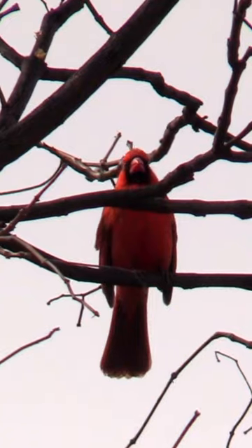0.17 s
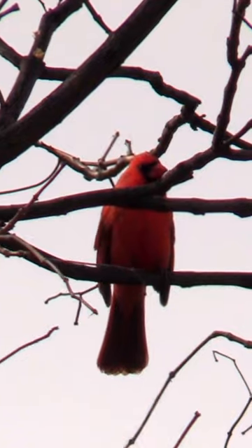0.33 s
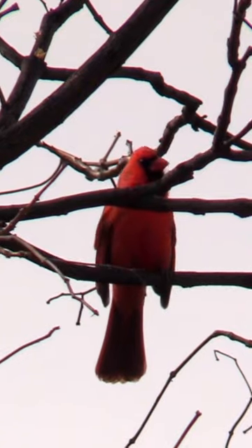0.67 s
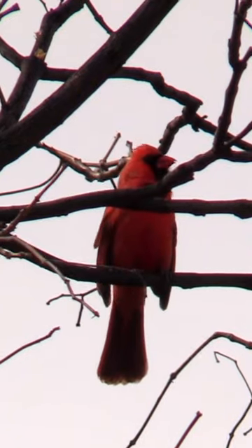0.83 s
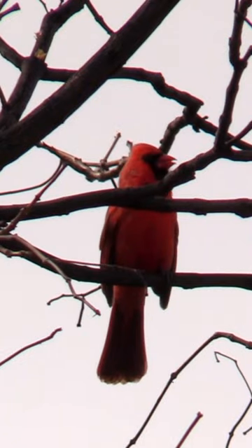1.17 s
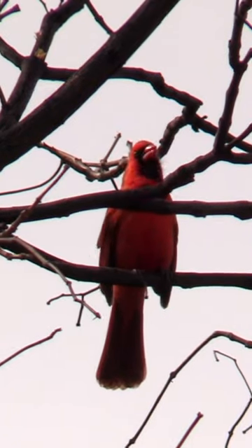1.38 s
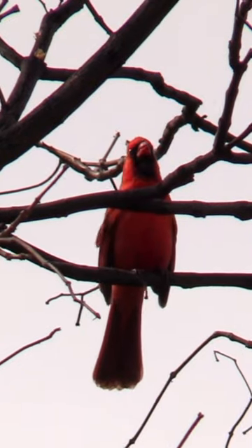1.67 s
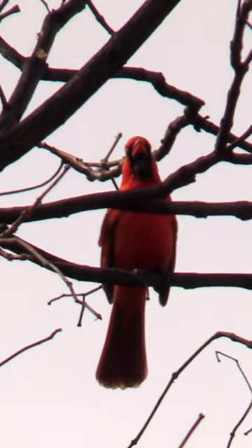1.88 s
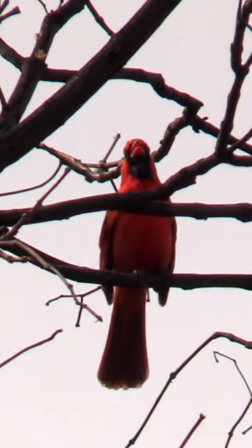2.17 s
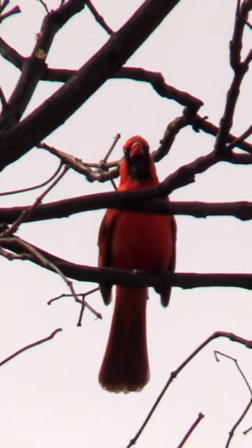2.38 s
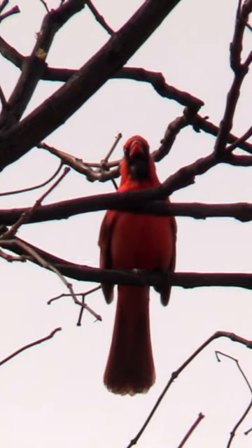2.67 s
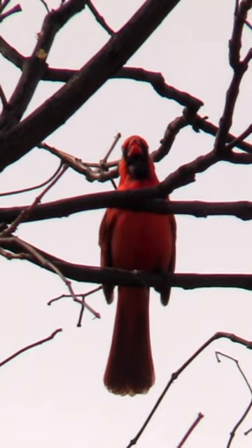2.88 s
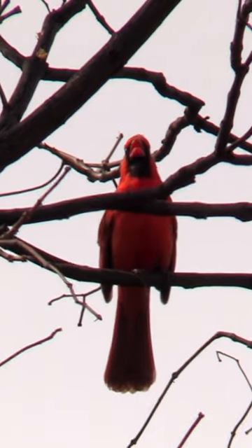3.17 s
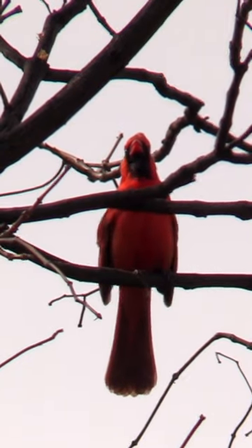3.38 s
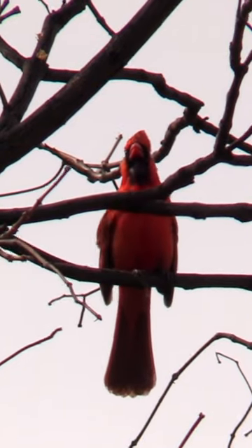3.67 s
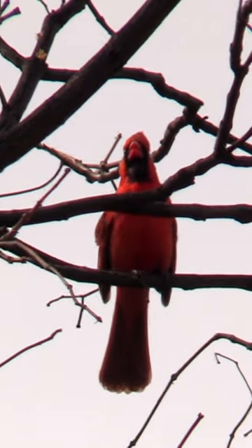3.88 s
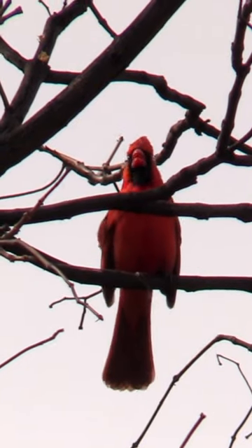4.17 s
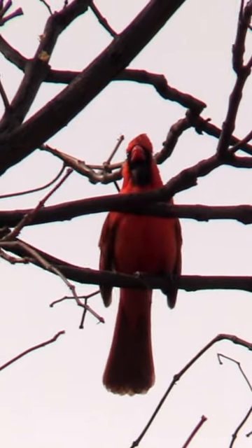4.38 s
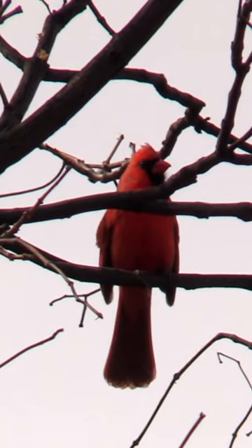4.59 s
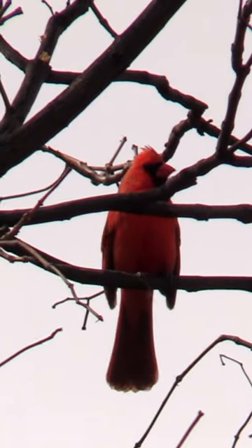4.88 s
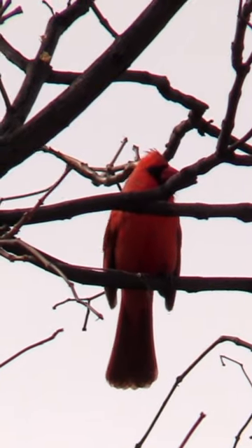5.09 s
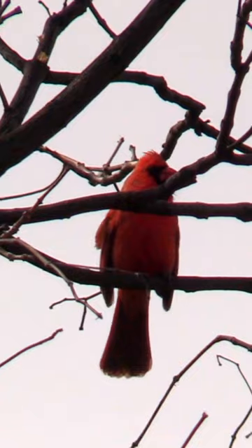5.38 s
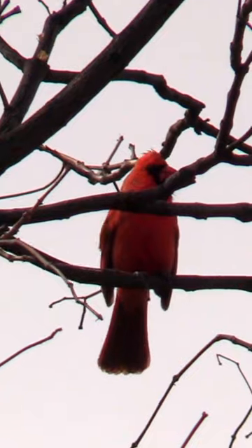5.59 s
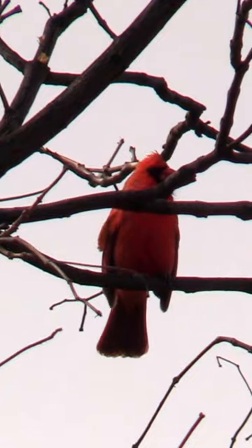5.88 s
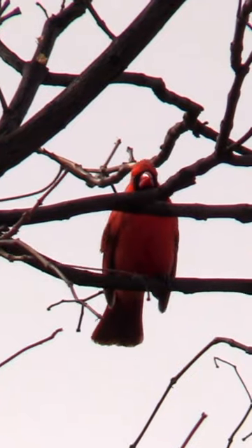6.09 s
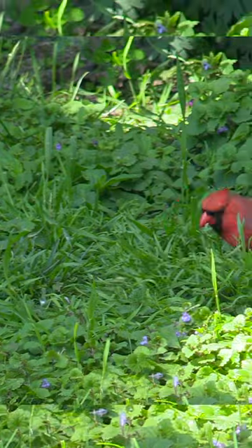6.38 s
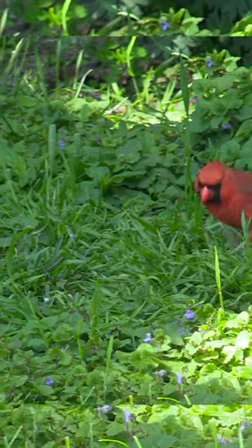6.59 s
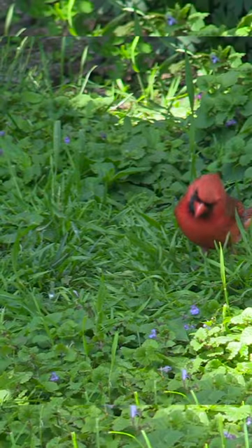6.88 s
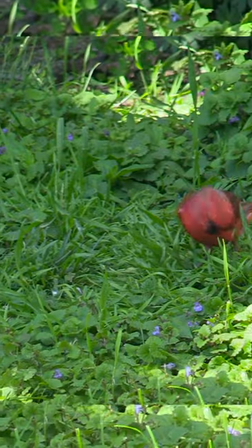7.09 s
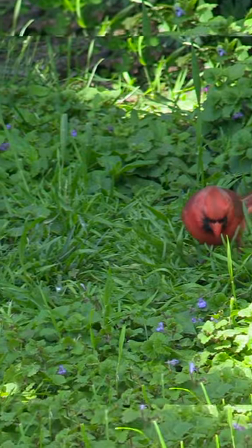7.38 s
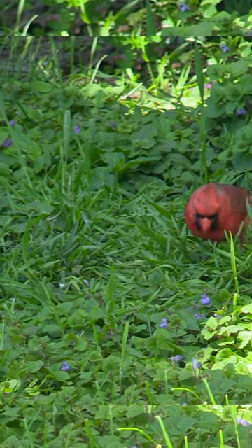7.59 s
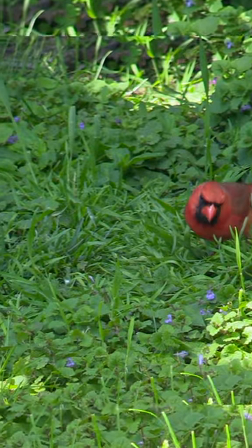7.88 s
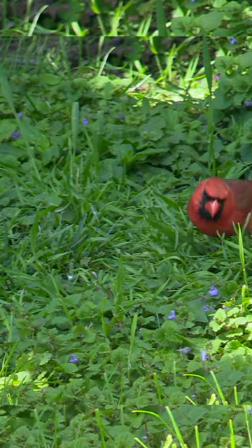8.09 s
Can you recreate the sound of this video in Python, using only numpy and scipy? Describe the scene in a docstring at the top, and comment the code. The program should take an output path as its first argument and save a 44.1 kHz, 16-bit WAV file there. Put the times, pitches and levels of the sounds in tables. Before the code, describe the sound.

Clear down-slurred songbird whistles ring among trees, followed by distant dove coos and softer whistles, over a steady far traffic hum.

```python
"""Songbirds over distant traffic.

A songbird on a branch whistles hooks, rises and down-slurs; trees return a short wash of echoes.
A neighbour answers with raspy arches and a dove coos. The scene then changes to a garden: flatter
slurs and a plunging whistle over a fuller hum. Each whistle is a gliding syrinx tone whose
overtones are shaped by windpipe and beak."""
import sys
import numpy as np
from scipy import signal
from scipy.fft import rfft, irfft
from scipy.io import wavfile
from scipy.ndimage import uniform_filter1d

SR = 44100
rng = np.random.default_rng(int(sys.argv[2]) if len(sys.argv) > 2 else 0)


def generate_wav(signal):
    """Clip the signal to [-1, 1] and save it as 16-bit WAV at the path in sys.argv[1]."""
    frames = np.transpose(np.atleast_2d(signal))
    scaled = np.clip(frames, -1, 1) * 32767
    pcm = np.round(scaled).astype(np.int16)
    wavfile.write(sys.argv[1], SR, pcm)


N = 363384
GARDEN_START_S = 6.42

# Far traffic and air at each place. Each row: frequency in Hz, relative density in dB.
BRANCH_HUM = [(15, -70), (25, -25.5), (45, -22.5), (135, -6.5), (240, -2), (410, -4.5), (545, -4.5),
              (625, -1.5), (690, -4.5), (780, -11.5), (1200, -8.5), (1330, -16), (1630, -17.5),
              (2600, -21.5), (6000, -30), (15600, -43)]
GARDEN_HUM = [(15, -45), (25, -28), (70, -17.5), (152, -2), (511, -5), (651, -8), (744, -7.5),
              (2070, -20.5), (4910, -27), (15600, -42.5)]
# Echoes off trunks and walls, near and far paths. Each row: delay in seconds, energy per ms in dB.
NEAR_ECHOES = [(.003, -33), (.009, -15), (.012, -24.5), (.021, -18), (.027, -24), (.05, -31.5), (.1, -37),
               (0.129, -39.5), (.2, -50.5), (.3, -58), (.6, -61)]
FAR_ECHOES = [(.003, -11), (.01, -19), (.022, -24), (.04, -28), (0.082, -28), (.12, -36.5), (.14, -35.5),
              (.2, -45), (.3, -53), (.6, -71)]

# Windpipe and beak response. Each row: frequency in Hz, gain in dB.
SINGER_THROAT = [(1400, -15), (1800, -11), (2200, -4), (3000, 6), (4000, -16), (6000, -9), (6900, -8),
                 (7500, 9), (8200, 4), (9000, 2), (10500, -5), (11400, 4.5), (12500, -2.5), (15500, -30)]
NEIGHBOUR_THROAT = [(2300, -21.5), (3000, -13), (4000, -4.5), (4700, 1.5), (5700, 2), (7600, -12.5),
                    (9200, -6.5), (11500, -4), (15500, -36)]
GARDEN_THROAT = [(1400, -12), (1800, -8), (2200, -0.5), (3000, 19), (3700, 1), (4200, -10.5), (6000, -8),
                 (7000, -9), (8000, -1.5), (9500, -6), (10800, -5), (12000, 10.5), (13000, -7),
                 (15500, -20)]
# Handover from the low to the high side of the syrinx: start and end pitch in Hz.
HANDOVER_HZ = [2150, 2860]
# Overtones 2, 3, .. re the fundamental, before brightness and throat.
# Each row: low side in dB, high side in dB.
OPENING_OVERTONES_DB = [(-39, -28), (-67.5, -41), (-38.5, -39), (-43, -37), (-39.5, -51), (-48, -52)]
SLUR_OVERTONES_DB = [(-31, -26.5), (-45, -41), (-32.5, -38.5), (-49, -26), (-48, -53), (-50.5, -57),
                     (-56, -66)]
NEIGHBOUR_OVERTONES_DB = [(-20.5, -15), (-30, -30), (-28, -35)]
GARDEN_OVERTONES_DB = [(-34, -47), (-49, -50), (-33.5, -50), (-39, -42), (-41.5, -50), (-58, -50)]
PLUNGE_OVERTONES_DB = [(-24, -27.5), (-45, -41.5)]

# Dove, one list per coo. Each row: time in seconds, pitch in Hz, level in dB.
COOS = [
    [(3.975, 474, -42), (4.067, 490, -40), (4.28, 457, -43.5), (4.59, 466, -38.5), (4.75, 452, -43.5)],
    [(4.75, 497, -54), (4.77, 494, -33.5), (4.792, 527, -24), (4.804, 656, -32.5), (4.822, 675, -32),
     (5.02, 664, -33.5), (5.182, 628, -31.5), (5.3, 610, -37.5), (5.42, 613, -52)],
    [(5.64, 494, -40), (5.664, 495, -33), (5.732, 502, -26), (5.954, 499, -32), (6.15, 484, -35.5),
     (6.32, 476, -37), (6.41, 452, -52)],
]
# Brief dips in the coos. Each row: time in seconds, depth in dB.
COO_DIPS = [(4.297, 9), (4.645, 6), (5.086, 14), (6.088, 13), (6.174, 14)]

# Single notes. Each row: time in seconds, pitch in Hz, level in dB, brightness in dB, optional rasp 0-1.
DROP = [(1.648, 1330, -45, -2), (1.654, 1890, -39, -2), (1.662, 2004, -27, -13), (1.72, 1662, -25.5, -6),
        (1.748, 1470, -39, -9)]
CHIP = [(1.648, 2730, -29.5, -20), (1.654, 3780, -29, -20), (1.662, 4090, -45, -22), (1.7, 3670, -57, -17)]   # an octave above the drop's start
POINTED_NOTE = [(4.53, 3000, -63, -10, .2), (4.57, 3830, -52, -10, .2), (4.595, 4920, -58, -8, .2),
                (4.62, 3970, -50, -8, .2), (4.65, 3480, -55, -8, .2)]   # faint, up and down
PLUNGES = [
    [(7.964, 7260, -41, -1), (7.968, 6400, -38, -3), (7.978, 5900, -30.5, -10), (7.995, 4970, -32, 6),
     (8.008, 4070, -27.5, -5), (8.013, 3795, -20.5, -1), (8.03, 3425, -19.5, 10), (8.048, 3120, -24.5, -1),
     (8.056, 2830, -37, -1)],
]   # list of one note

# Repeated note shapes. Each row: time from onset in seconds, pitch in Hz, level in dB,
# brightness in dB, optional rasp 0-1.
HOOK_SHAPE = [(0, 3100, -36, -5.5), (.008, 2480, -21.5, -4), (.018, 2604, -22, 4), (.028, 3010, -22.5, 8),
              (.041, 2450, -23, -1), (.057, 2090, -27, -6), (.078, 1830, -33, -10)]
SLUR_SHAPE = [(0, 5060, -56, -20), (.0035, 3980, -35, -18), (.005, 3303, -16.5, -1), (.011, 2587, -12, -4),
              (.019, 2682, -10.5, -6), (.028, 2941, -14, 5.5), (.036, 2975, -11, -1), (.049, 2385, -10, -8),
              (.058, 2230, -14, -2), (.105, 1989, -14, -4.5), (.135, 1850, -20.5, 0),
              (.19, 1700, -22.5, -5), (.245, 1539, -33.5, -7), (.268, 1390, -47, -22)]
ARCH_SHAPE = [(0, 2364, -50, 3, .65), (.013, 2780, -40.5, -5.5, .6), (.035, 3083, -35, -0.5, .6),
              (.055, 3560, -26, -7, .65), (.07, 3950, -24, -4, 0.4), (.085, 4400, -29, -18, 0),
              (.1, 4547, -24, -11, 0.07), (.116, 4420, -31.5, -3, .05), (.132, 3920, -25, -10, .15),
              (.15, 3310, -26.5, -19, .05)]
GARDEN_HOOK_SHAPE = [(0, 1930, -46.5, -6), (.011, 2480, -36, -6), (.024, 2672, -28, -6),
                     (.045, 2640, -44.5, -6), (.075, 2530, -46, -6), (.093, 2280, -59, -6)]
# Their repeats. Each row: start in seconds, gain in dB, pitch factor, length factor,
# added brightness in dB.
HOOKS = [(.68, -8.5, .975, .93, -7), (1.238, -1, 1.01, 1.02, -7.5)]
SLURS = [(1.8401, -3.5, 0.99, 1.04, -1), (2.1891, -2.3, 0.99, 1.025, 1), (2.5345, -1.3, 1.004, 1.005, 0),
         (2.881, -1, 1.014, 0.95, 0.5), (3.2185, -1, 1.005, 0.95, 0), (3.5682, -1.7, .992, 0.94, -1.5),
         (3.9051, -3, .988, 0.94, -2.5), (4.254, -3.5, 1.016, 0.78, -1)]
ARCHES = [(4.795, 1.5, 1.018, 0.97, .5), (5.309, -1, 1.002, .96, -5)]
GARDEN_HOOKS = [(6.78, -1.5, 0.99, 0.87, .5), (7.454, 0, 0.99, 0.95, .5), (8.109, 9.5, .995, .98, -1)]

# Glide shapes. Each row: share of length, share of pitch span, level in dB, brightness in dB,
# optional rasp 0-1.
RISE_SHAPE = [(0, 0, -30, -10), (.2, .27, -10.5, -15), (.42, .53, -3.5, -5), (.78, 1, 3.5, -3),
              (.93, .93, -5.5, -6), (1, .9, -37, -2)]
CHIRP_SHAPE = [(0, 0, -1.5, -3.5, 0.4), (.45, 0.53, -1, 0, 0.4), (1, 1, -7, 0, .3)]
GARDEN_SLUR_SHAPE = [(0, 0, -17.5, -2), (.16, .12, -5.5, 3), (.4, .47, 0, 0), (.66, .76, 0.5, -6.5),
                     (.86, .92, -8, 2), (1, 1, -21, -4)]
# Their notes. Each row: start in seconds, length in seconds, start pitch in Hz, target pitch in Hz,
# gain in dB, added brightness in dB.
RISES = [(0.846, 0.19, 1640, 2480, -25.5, -6), (1.39, 0.2, 1620, 2596, -16, 0)]
CHIRPS = [(1.348, 0.091, 3010, 4210, -47, -2), (5.212, 0.12, 2810, 4230, -43, -14)]
GARDEN_SLURS = [(6.878, 0.32, 2196, 1673, -26.5, -7), (7.554, 0.3, 2228, 1672, -24, -4.5),
                (8.197, .15, 2370, 1860, -29, 4)]


def from_db(db):
    """Decibels to gain."""
    return 10 ** (np.asarray(db) / 20)


def wander(rate_hz):
    """Low-passed noise, rms 1."""
    x = signal.sosfilt(signal.butter(2, rate_hz, fs=SR, output="sos"), rng.standard_normal(N))
    return x / x.std()


def db_at_hz(spectrum, hz):
    """Spectrum interpolated on a log-frequency axis."""
    points_hz, points_db = np.transpose(spectrum)
    return np.interp(np.log(hz), np.log(points_hz), points_db)


def coloured_noise(spectrum):
    """Noise with the given spectrum, rms 1."""
    hz = np.arange(1, N // 2 + 2) * SR / N
    x = irfft(rfft(rng.standard_normal(N)) * from_db(db_at_hz(spectrum, hz)), N)
    return x / x.std()


def traffic_hum(branch_db=-41.5, garden_db=-40.5, whine_db=-56, whine_hz=1238, whine_width_hz=4.4):
    """Far traffic and air at each place; one faint narrow whine in both."""
    radius = np.exp(-np.pi * whine_width_hz / SR)
    angle = 2 * np.pi * whine_hz / SR
    whine = signal.lfilter([1, 0, -1], [1, -2 * radius * np.cos(angle), radius ** 2],
                           rng.standard_normal(N))
    branch = from_db(branch_db) * coloured_noise(BRANCH_HUM)
    garden = from_db(garden_db) * coloured_noise(GARDEN_HUM)
    hum = np.where(np.arange(N) < GARDEN_START_S * SR, branch, garden)
    return hum + from_db(whine_db) * whine / whine.std()


def tree_echoes(x, echoes=NEAR_ECHOES, clump_db=3.0, clump_hz=60, dull_hz=4520, treble_t60_s=0.35):
    """Clumped trunks scatter a patchy noise tail; leaves and air add treble decay."""
    delay_s, level_db = np.transpose(echoes)
    t = np.arange(SR) / SR
    envelope_db = np.interp(t, delay_s, level_db, left=-200, right=-200)
    envelope_db += clump_db * wander(clump_hz)[:SR]
    tail = rng.standard_normal(SR) * from_db(envelope_db) * np.sqrt(1000 / SR)
    dull = signal.sosfilt(signal.butter(1, dull_hz, fs=SR, output="sos"), tail)
    treble = (tail - dull) * from_db(-60 * t / treble_t60_s)
    return signal.fftconvolve(x, dull + treble)[:N]


def wall_echo(x, delay_s=0.026):
    """One clear reflection off a garden wall."""
    return np.pad(x, (round(delay_s * SR), 0))[:N]


def repeats(shape, events):
    """One motor pattern, stretched and transposed per note."""
    return [[(start_s + dt_s * stretch, hz * transpose, db + gain_db, bright_db + beak_db, *rasp)
             for dt_s, hz, db, bright_db, *rasp in shape]
            for start_s, gain_db, transpose, stretch, beak_db in events]


def glides(shape, events):
    """One glide pattern, scaled to each note's length and pitch span."""
    return [[(start_s + share * length_s, hz + span * (to_hz - hz),
              db + gain_db, bright_db + beak_db, *rasp)
             for share, span, db, bright_db, *rasp in shape]
            for start_s, length_s, hz, to_hz, gain_db, beak_db in events]


def syrinx(notes, throat, overtones_db, edge_s, glide_s, rasp_hz=279, rasp_jitter=0.097):
    """Gliding near-sines; overtones flare at throat resonances. Strain adds throb and frays them."""
    out = np.zeros(N)
    flutter_db = 4.5 * wander(rate_hz=50)
    fray = 0.78 * wander(rate_hz=450)
    throb_hz = rasp_hz * (1 + rasp_jitter * wander(rate_hz=78.4))
    throb = np.cos(2 * np.pi * np.cumsum(throb_hz) / SR)
    for rows in notes:
        times_s, *columns = np.transpose(rows)
        at = np.arange(round(times_s[0] * SR), min(round(times_s[-1] * SR), N))
        t = at / SR
        curves = [np.interp(t, times_s, column) for column in columns]
        hz, level_db, bright_db, rasp = curves + [0] * (4 - len(curves))
        pitch_hz = uniform_filter1d(hz, round(glide_s * SR), mode="nearest")   # muscles round corners
        phase = 2 * np.pi * np.cumsum(pitch_hz) / SR
        to_edge_s = np.minimum(t - times_s[0], times_s[-1] - t)
        gate = np.sqrt(2) * np.clip(to_edge_s / edge_s, 0, 1)
        out[at] += gate * from_db(level_db) * (1 + rasp * throb[at]) * np.sin(phase)
        drive_db = level_db + bright_db - db_at_hz(throat, pitch_hz)
        for k, sides_db in enumerate(overtones_db, 2):
            partial_hz = k * pitch_hz
            partial_db = np.interp(pitch_hz, HANDOVER_HZ, sides_db) + np.roll(flutter_db, k * SR)[at]
            gain = from_db(drive_db + partial_db + db_at_hz(throat, partial_hz)) * (partial_hz < SR / 2)
            out[at] += gate * gain * (1 + rasp * fray[at]) * np.sin(k * phase)
    return out


def dove(waver_db=2.0, waver_hz=14, dip_half_width_s=0.011, wet_db=-16):
    """Far pure-tone coos that waver in moving air and dip briefly."""
    coos = syrinx(COOS, throat=[(400, 0), (800, 0)], overtones_db=[], edge_s=0.0029, glide_s=0.006)
    t = np.arange(N) / SR
    dips_db = sum(db * np.exp(-((t - time_s) / dip_half_width_s) ** 2) for time_s, db in COO_DIPS)
    coos *= from_db(waver_db * wander(waver_hz) - dips_db)
    return coos + from_db(wet_db) * tree_echoes(coos)


def neighbour(chirp_direct_db=-8):
    """Far raspy whistles; branches weaken the direct path of the chirps."""
    voice = NEIGHBOUR_THROAT, NEIGHBOUR_OVERTONES_DB
    chirps = syrinx(glides(CHIRP_SHAPE, CHIRPS), *voice, edge_s=0.0091, glide_s=0.005)
    arches = syrinx(repeats(ARCH_SHAPE, ARCHES) + [POINTED_NOTE], *voice, edge_s=0.0026, glide_s=0.0076)
    return arches + from_db(chirp_direct_db) * chirps + tree_echoes(arches + chirps, FAR_ECHOES)


def garden_song(song_wall_db=-8.5, plunge_wall_db=-14, song_wet_db=2.5, plunge_wet_db=-0.5):
    """Upward hooks, flat slurs and one plunge, reflected by a wall and trees."""
    notes = repeats(GARDEN_HOOK_SHAPE, GARDEN_HOOKS) + glides(GARDEN_SLUR_SHAPE, GARDEN_SLURS)
    song = syrinx(notes, GARDEN_THROAT, GARDEN_OVERTONES_DB, edge_s=0.003, glide_s=0.0056)
    plunge = syrinx(PLUNGES, GARDEN_THROAT, PLUNGE_OVERTONES_DB, edge_s=0.00095, glide_s=0.003)
    wall = wall_echo(from_db(song_wall_db) * song + from_db(plunge_wall_db) * plunge)
    trees = tree_echoes(from_db(song_wet_db) * song + from_db(plunge_wet_db) * plunge)
    return song + plunge + wall + trees


def branch_song():
    """Near bird among trees: hooks, rises, a drop with a chip, then a run of down-slurs."""
    opening = repeats(HOOK_SHAPE, HOOKS) + glides(RISE_SHAPE, RISES) + [DROP, CHIP]
    slurs = repeats(SLUR_SHAPE, SLURS)
    song = syrinx(opening, SINGER_THROAT, OPENING_OVERTONES_DB, edge_s=0.001, glide_s=0.0033)
    song += syrinx(slurs, SINGER_THROAT, SLUR_OVERTONES_DB, edge_s=0.00076, glide_s=0.001)
    return song + tree_echoes(song)


def scene():
    """Birds and their echoes over the hum, mono."""
    return (traffic_hum() + dove() + neighbour() + garden_song() + branch_song())[None]


def record(dry):
    """Brief silence, fast fade-in, steep low-pass."""
    start_s, fade_s, cutoff_hz = 0.036, 0.002, 15780
    fade_in = np.clip((np.arange(N) / SR - start_s) / fade_s, 0, 1)
    return signal.sosfilt(signal.ellip(12, 0.5, 70, cutoff_hz, fs=SR, output="sos"), dry * fade_in)


dry = scene()
out = record(dry)
generate_wav(out)
```